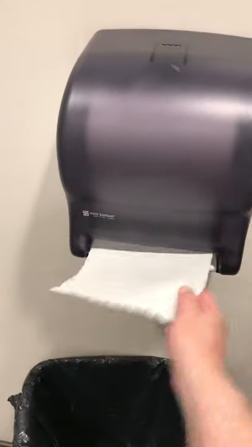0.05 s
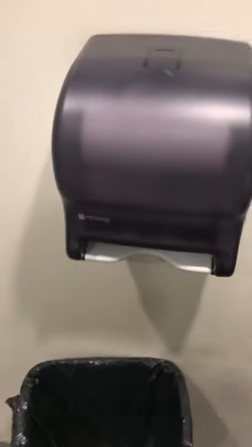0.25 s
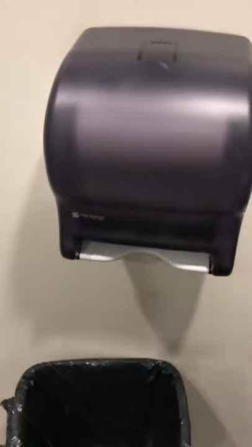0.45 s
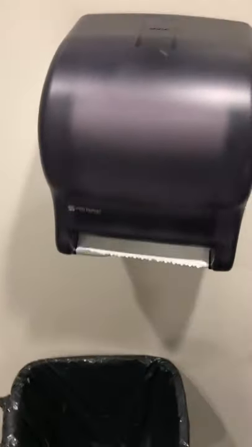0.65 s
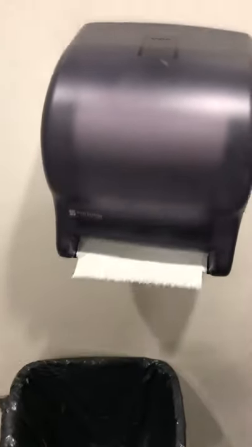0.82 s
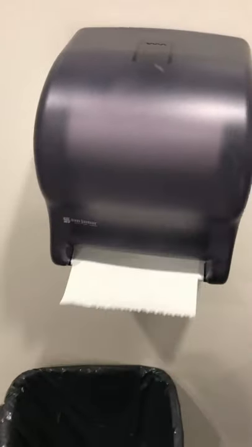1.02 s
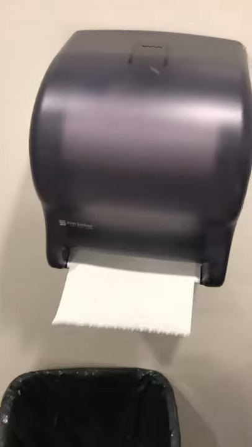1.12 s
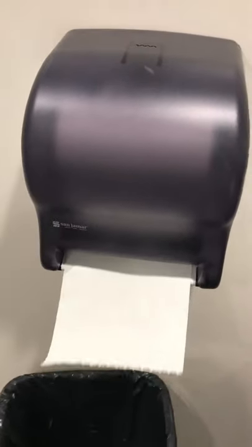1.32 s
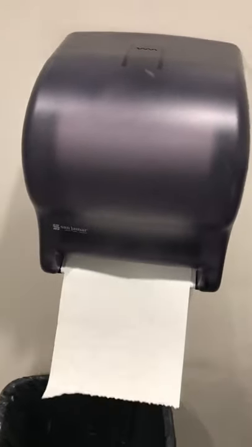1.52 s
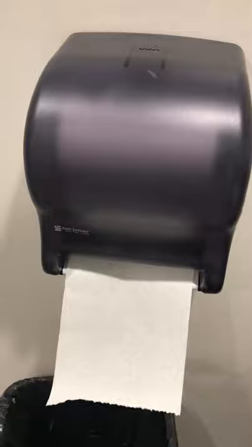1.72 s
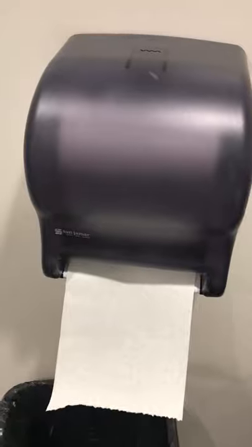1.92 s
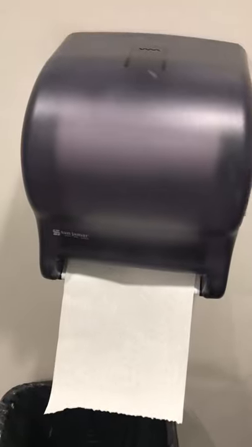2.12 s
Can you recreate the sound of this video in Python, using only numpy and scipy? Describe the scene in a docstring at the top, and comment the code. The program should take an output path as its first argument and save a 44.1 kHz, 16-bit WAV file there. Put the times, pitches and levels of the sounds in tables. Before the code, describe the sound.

A paper towel dispenser gives a sharp rip and a plastic thump as a sheet is torn off. Its small geared motor then whirs, feeding more paper, and winds down. Faint rustling follows in the echoing tiled restroom.

```python
"""A paper towel dispenser in a tiled restroom: a sheet is ripped off and the plastic housing thumps.
The tear is a dense train of fibre fractures; the thump is the free decay of the housing's modes.
A small geared motor spins up and feeds the next sheet, whining at the tooth-mesh rate and rattling
with the tooth impacts, then coasts down with a thin squeak. The torn sheet rustles faintly in the
hand, and the tiles reverberate over the steady ventilation."""
import sys
import numpy as np
from scipy import signal
from scipy.io import wavfile

SR = 44100
rng = np.random.default_rng(int(sys.argv[2]) if len(sys.argv) > 2 else 0)


def generate_wav(signal):
    """Clip the signal to [-1, 1] and save it as 16-bit WAV at the path in sys.argv[1]."""
    frames = np.transpose(np.atleast_2d(signal))
    scaled = np.clip(frames, -1, 1) * 32767
    pcm = np.round(scaled).astype(np.int16)
    wavfile.write(sys.argv[1], SR, pcm)


N = 94815
TIME = np.arange(N) / SR
RUN_HZ = 1140  # tooth-mesh rate at running speed


def amp(db):
    """Decibels as an amplitude ratio."""
    return 10 ** (np.asarray(db) / 20)


def unit_rms(x):
    """Normalisation to an rms of 1."""
    return x / np.sqrt(np.mean(abs(x) ** 2) + 1e-20)


def curve(points):
    """Linear interpolation of (time_s, value) points at every sample."""
    return np.interp(TIME, *np.transpose(points))


def at_frequency(points, hz):
    """Interpolation of (frequency_hz, value) points on a logarithmic frequency axis."""
    point_hz, value = np.transpose(points)
    return np.interp(np.log(hz + 1), np.log(point_hz + 1), value)


def colour(x, spectrum):
    """Minimum-phase filtering at unit energy: only the shape of the spectrum counts."""
    log_gain = np.log(amp(at_frequency(spectrum, abs(np.fft.fftfreq(4096, 1 / SR)))))
    taps = np.fft.ifft(np.exp(np.conj(signal.hilbert(log_gain)))).real[:2048]
    return signal.fftconvolve(x, taps / np.linalg.norm(taps))[:N]


def wander(hz):
    """Random modulation: complex noise of rms 1, low-passed at about hz."""
    noise = rng.standard_normal(N) + 1j * rng.standard_normal(N)
    return unit_rms(np.fft.ifft(noise / (1 + (np.fft.fftfreq(N, 1 / SR) / hz) ** 2)))


def random_phasor(cycles):
    """A complex oscillation with a random starting phase."""
    return np.exp(2j * np.pi * (cycles + rng.random()))


def crackle(per_s, spread_db):
    """Shot noise: a Poisson train of clicks with sizes scattered by spread_db, rms 1."""
    sizes = amp(spread_db * np.minimum(rng.exponential(1, N), 4)) * rng.choice([-1, 1], N)
    return unit_rms(sizes * (rng.random(N) < per_s / SR))


def resonance(x, hz, width_hz):
    """A single damped mode that preserves the rms of white noise."""
    radius = np.exp(-np.pi * width_hz / SR)
    pole = radius * np.exp(2j * np.pi * hz / SR)
    return np.sqrt(2 * (1 - radius ** 2)) * signal.lfilter([1], [1, -pole], x).real


def gear_tones(orders, teeth):
    """Rotational orders: tones locked to the mesh, each part steady and part randomly modulated."""
    tones = np.zeros(N)
    for multiple, db, roughness in orders:
        modulation = np.sqrt(1 - roughness ** 2) + roughness * wander(hz=35.5)
        tones += np.sqrt(2) * amp(db) * (modulation * random_phasor(multiple * teeth)).real
    return tones


def ventilation():
    """Broadband flow noise and a wavering fan hum, which beats against the tone of the motor shaft."""
    # Fan tones: pitch_hz, level_db
    fan_tones = [(293.5, -47.5), (360, -51.5), (420, -52)]
    # Spectrum of the moving air: frequency_hz, density_db
    air_spectrum = [(15, -43), (30, -19.5), (65, -5.5), (90, -12.5), (130, -8.5), (300, -6.5), (500, -9),
                    (750, -6), (1000, -11.5), (1600, -12.5), (2230, -22.5), (2850, -25), (6000, -33),
                    (15500, -56)]
    hum = sum(amp(db) * ((1 + 0.18 * wander(hz=2.6)) * random_phasor(hz * TIME)).real
              for hz, db in fan_tones)
    return amp(-39.5) * colour(rng.standard_normal(N), air_spectrum) + np.sqrt(2) * hum


def tear():
    """Acoustic emission of fracture: fibres break along the blade in a crackle with sharp snaps."""
    # Force of the tear along the toothed blade: time_s, level_db
    force = [(0.165, -37), (0.203, -18), (0.209, -7), (0.226, -4), (0.238, 0), (0.258, 0.5), (0.268, -3.5),
             (0.285, -16)]
    # Single snaps of the paper: start_s, level_db
    snaps = [(0.2062, 1), (0.222, -0.5), (0.2374, 5), (0.2417, 5), (0.257, -1)]
    # Spectrum of the tearing sheet: frequency_hz, density_db
    spectrum = [(40, -31), (90, -25), (160, -2.5), (400, -12), (640, -10.5), (1090, -10), (1310, -6),
                (1700, -9), (4460, -14), (5000, -20.5), (7000, -23), (10500, -31), (15500, -31.5)]
    snap_decay_s, fizz_hz, fizz_peak_s, fizz_width_s = 0.0011, 15200, 0.218, 0.009
    tearing = (TIME > force[0][0]) * (TIME < force[-1][0])
    fractures = amp(curve(force) - 17.5) * crackle(per_s=7000, spread_db=3.5) * tearing
    for start_s, db in snaps:
        burst = rng.standard_normal(N) * (TIME >= start_s) * np.exp(-abs(TIME - start_s) / snap_decay_s)
        fractures += amp(db + 3.5) * burst / np.linalg.norm(burst) / 2
    # A high fizz as the first edge gives way.
    fizz = (wander(hz=2600) * np.exp(2j * np.pi * fizz_hz * TIME)).real
    fizz_envelope = amp(-34) * np.exp(-((TIME - fizz_peak_s) / fizz_width_s) ** 2)
    return colour(fractures, spectrum) + fizz_envelope * fizz


def thump(start_s=0.232, attack_s=0.0055):
    """Free vibration: the housing's modes are struck as the sheet comes free and decay exponentially."""
    # Modes of the plastic housing: pitch_hz, level_db, t60_s
    modes = [(63.3, -36, 0.57), (136, -41, 0.21), (170, -35.5, .25), (215, -33, 0.11), (261.8, -26, 0.73),
             (401, -17.5, 0.097), (539.7, -19.5, .13), (746, -30, 0.088)]
    age = np.maximum(TIME - start_s, 0)
    ringing = sum(amp(db) * 1e-3 ** (age / t60) * random_phasor(hz * age).imag for hz, db, t60 in modes)
    return ringing * np.minimum(age / attack_s, 1)


def motor_motion(wobble_hz=5.6):
    """Phase is the integral of rate: returns mesh rate, relative speed and the count of teeth passed."""
    # Spin-up, feed and coast of the motor: time_s, mesh_hz
    mesh_rate = [(0.29, 29.9), (0.335, 499.5), (0.37, 1079), (0.41, 1164), (0.53, 1175), (0.7, 1150),
                 (0.95, 1137), (1.05, 1131), (1.15, 1138), (1.27, 1120), (1.4, 1128), (1.5, 1149),
                 (1.545, 1123), (1.6, 893), (1.66, 598.4), (1.71, 382), (1.745, 301.9), (1.8, 30.02)]
    (start_s, start_hz), stop_s = mesh_rate[0], mesh_rate[-1][0]
    wobble = 0.005 * random_phasor(wobble_hz * TIME).imag  # the roller is out of round
    mesh_hz = curve(mesh_rate) * (1 + wobble)
    speed = np.clip((mesh_hz - start_hz) / RUN_HZ, 0, 2) * (TIME > start_s) * (TIME < stop_s)
    # Slack gears turn unevenly below full speed.
    flutter_depth = 0.011 + 0.14 * np.maximum(1 - mesh_hz / RUN_HZ, 0)
    flutter = flutter_depth * unit_rms(wander(hz=59.95).real)
    teeth = np.cumsum(abs(mesh_hz * (1 + flutter))) / SR
    return mesh_hz, speed, teeth


def gears(speed, teeth, tick_decay_s=0.00054, low_cut_hz=1530):
    """Impact excitation: each tooth ticks into gearbox, housing and frame, among weaker gear tones."""
    # Response of the gearbox: frequency_hz, density_db
    rattle_spectrum = [(1000, -21.5), (1700, -0.5), (1880, -5.5), (2270, 1.5), (2780, -8.5), (3430, -3.5),
                       (3770, -15.5), (4500, -9.5), (4830, -20.5), (5710, -16), (7820, -25), (10400, -39),
                       (15500, -49)]
    # Strength of the gearbox rattle: time_s, level_db
    rattle_level = [(0.33, -51), (0.45, -31.5), (1.0, -32), (1.5, -30.5), (1.7, -39.5)]
    # Response of the housing under the gears: frequency_hz, density_db
    body_spectrum = [(90, -12.5), (170, -5), (300, -0.5), (480, -10), (750, 5), (950, -6.5), (1500, 5),
                     (1900, -1), (3500, -47)]
    # Clatter of the housing, stronger when the gears are slack: time_s, level_db
    body_level = [(0.33, -28), (0.42, -35.5), (1.0, -34.5), (1.5, -33.5), (1.62, -30.5), (1.72, -29)]
    # Modes of the drive frame: pitch_hz, width_hz, level_db
    frame_modes = [(1063, 5.2, -36), (1126, 6.5, -30), (962, 20, -43), (1540, 71, -42)]
    # Weaker tones of shaft and gears: mesh_multiple, level_db, roughness_fraction
    orders = [(.374, -45, 0.08), (.75, -42.5, 0.57), (1.268, -35.5, 0.96), (1.36, -43, 0.95),
              (2, -42, 0.57), (3, -45, 0.75), (4, -49, .6)]
    tooth_force = amp(1.5 * rng.standard_normal(N))[teeth.astype(int)]
    tooth_decay = np.exp(-(teeth % 1) / RUN_HZ / tick_decay_s)  # lengthens below running speed
    ticks = tooth_force * tooth_decay * rng.standard_normal(N)
    ticks /= np.std(ticks[speed > 0.5])
    low_cut = signal.butter(2, low_cut_hz, "high", fs=SR, output="sos")
    rattle = amp(curve(rattle_level)) * speed * signal.sosfilt(low_cut, colour(ticks, rattle_spectrum))
    body = amp(curve(body_level)) * speed ** 0.86 * colour(ticks, body_spectrum)
    frame = sum(amp(db) * resonance(ticks * speed, hz, width_hz) for hz, width_hz, db in frame_modes)
    return rattle + body + frame + speed ** 2 * gear_tones(orders, teeth)


def whine(mesh_hz, speed, teeth):
    """Periodic forcing: meshing teeth give a rough tone, and the shaft a throbbing hum at its own rate."""
    # Mesh tone and its sidebands from the eccentric wheels: mesh_multiple, level_db, roughness_fraction
    mesh_orders = [(1, -2.5, 0.13), (.934, -8.5, 0.25), (.969, -21.5, 0.57), (1.035, -19, 0.89)]
    # Strength of the whine as the load on the gears comes and goes: time_s, level_db
    load = [(0.375, -17), (0.45, -18.5), (0.52, -17), (0.64, -24), (0.71, -15.5), (0.87, -15),
            (0.98, -16.5), (1.04, -27.5), (1.1, -13), (1.18, -17), (1.23, -45), (1.3, -13.5), (1.37, -26.5),
            (1.44, -12.5), (1.54, -18.5), (1.6, -18.5)]
    groan_hz, groan_width_hz = 365, 61
    teeth_per_turn, throb_hz, throb_peak_s = 4, 9.3, 1.0
    mesh = amp(curve(load) - 3) * speed ** 2.03 * gear_tones(mesh_orders, teeth)
    # The housing groans as the mesh tone sweeps through its resonance.
    response = np.exp(-((mesh_hz - groan_hz) / groan_width_hz) ** 2)
    groan = amp(-25.5) * response * np.sin(2 * np.pi * teeth)
    throb = 1 + 0.75 * np.cos(2 * np.pi * throb_hz * (TIME - throb_peak_s))
    shaft = amp(-38.5) * speed ** 3.1 * throb * np.sin(2 * np.pi * teeth / teeth_per_turn)
    return mesh + groan + shaft


def slide():
    """Friction noise: the growing sheet hisses over the lip of the slot."""
    # Strength of the hiss: time_s, level_db
    level = [(0.33, -74), (0.42, -44.5), (1.0, -43.5), (1.53, -41), (1.59, -56), (1.7, -90)]
    # Spectrum of paper on the lip: frequency_hz, density_db
    spectrum = [(1500, -39), (3500, 2), (5700, 7.5), (7500, -6.5), (9500, -6), (10800, -22), (15500, -23)]
    return amp(curve(level)) * colour(crackle(per_s=3100, spread_db=0), spectrum)


def swell(start_s, length_s):
    """A half-sine envelope that peaks slightly late."""
    return np.sin(np.pi * np.clip((TIME - start_s) / length_s, 0, 1) ** 1.1)


def bump(pitch_hz=66):
    """A low tone burst, heard as a soft bump halfway through the feed."""
    return amp(-43.5) * swell(start_s=1, length_s=0.12) * np.sin(2 * np.pi * pitch_hz * TIME)


def squeak(start_s=1.645, start_hz=8500, fall_hz_per_s=5400):
    """Narrow-band noise on a falling glide, heard as a thin squeak while the drive coasts to rest."""
    # Partials of the squeak: pitch_multiple, level_db
    partials = [(1, 1.5), (1.85, -7)]
    cycles = np.cumsum(start_hz - fall_hz_per_s * (TIME - start_s)) / SR
    bands = sum(amp(db) * (wander(hz=520) * np.exp(2j * np.pi * multiple * cycles)).real
                for multiple, db in partials)
    return amp(-47.5) * swell(start_s, length_s=0.15) * bands


def rustle():
    """Crumpling noise: the torn sheet gives off many small clicks in the hand."""
    # Handling of the sheet: time_s, level_db
    handling = [(0.3, -86), (1.6, -97), (1.8, -54), (1.88, -55), (1.925, -47), (1.975, -59), (2.035, -56),
                (2.07, -46.5), (2.11, -52), (2.15, -64)]
    # Spectrum of the crumpling paper: frequency_hz, density_db
    spectrum = [(800, -8), (2500, 5.5), (6000, 3), (9000, -3.5), (13000, -7), (16000, -8)]
    return amp(curve(handling)) * colour(crackle(per_s=3000, spread_db=-1.5), spectrum)


def room(x, early_db, tail_db):
    """Reverberation: direct sound, early reflections from the near wall, then the tiles' diffuse tail."""
    # Reverberation time of the tiled room: frequency_hz, t60_s
    decay_times = [(100, 0.35), (280, 1.13), (550, 0.77), (1130, 1.625), (2200, 1.18), (4500, 0.98),
                   (9000, 1), (16000, 0.2)]
    reflections_per_s, first_echo_s, early_t60_s, build_up_s = 1500, 0.002, 0.17, 0.015
    t = TIME[:SR]
    arrivals = rng.standard_normal(SR) * (rng.random(SR) < reflections_per_s / SR) * (t > first_echo_s)
    early = arrivals * amp(-60 * t / early_t60_s)
    diffuse = rng.standard_normal(SR) * np.minimum(t / build_up_s, 1)
    hz, frame_s, bands = signal.stft(diffuse, SR, nperseg=512)
    decay = amp(-60 * frame_s / at_frequency(decay_times, hz)[:, None])
    tail = signal.istft(bands * decay, SR, nperseg=512)[1][:SR] / np.sqrt(SR / 20)
    impulse_response = amp(early_db) * early / np.linalg.norm(early) + amp(tail_db) * tail
    return x + signal.fftconvolve(x, impulse_response)[:N]


def scene():
    """Superposition of tear, feed and rustle in the tiled room, over the ventilation."""
    mesh_hz, speed, teeth = motor_motion()
    hand = room(tear() + thump() + rustle(), early_db=-9.5, tail_db=-4)
    feed = amp(-2) * room(gears(speed, teeth) + slide() + squeak(), early_db=-9.5, tail_db=-2.5)
    tone = room(whine(mesh_hz, speed, teeth), early_db=-13.5, tail_db=-6)
    return (hand + feed + tone + bump() + ventilation())[None]


def record(dry):
    """Band limiting: a linear-phase low-pass filter removes the highest treble."""
    low_pass = signal.firwin(801, cutoff=15750, window=("kaiser", 9), fs=SR)
    return signal.oaconvolve(dry, low_pass[None], "same")


dry = scene()
out = record(dry)
generate_wav(out)
```